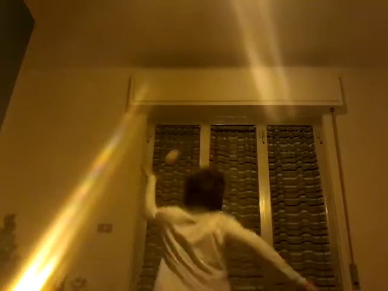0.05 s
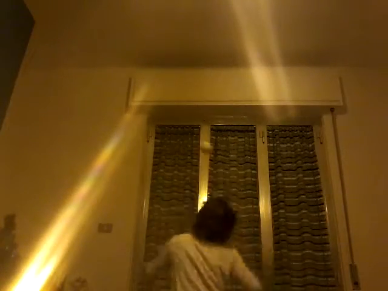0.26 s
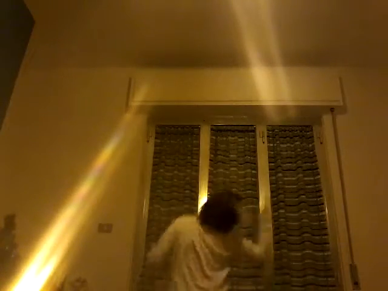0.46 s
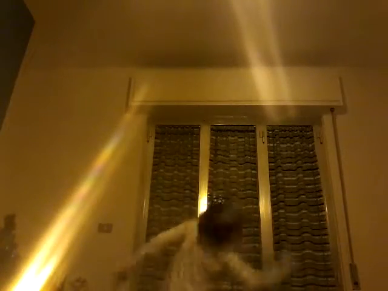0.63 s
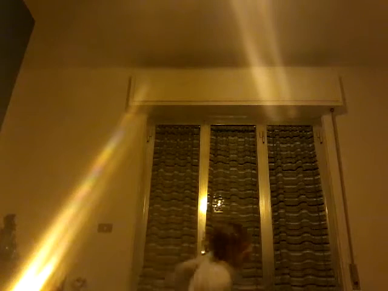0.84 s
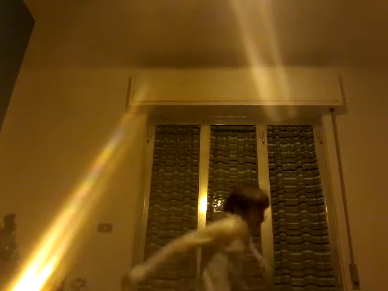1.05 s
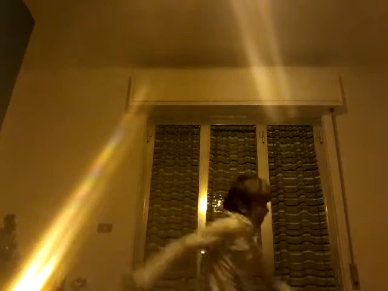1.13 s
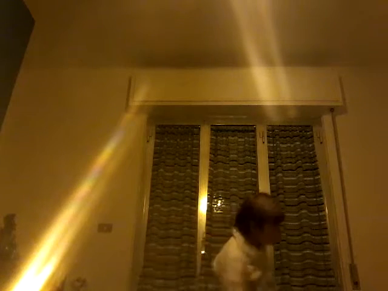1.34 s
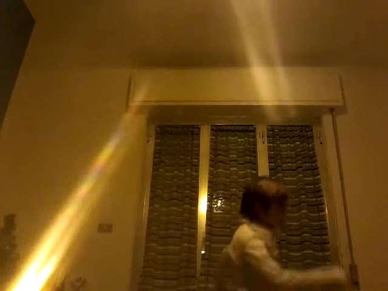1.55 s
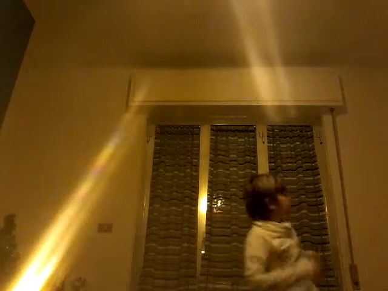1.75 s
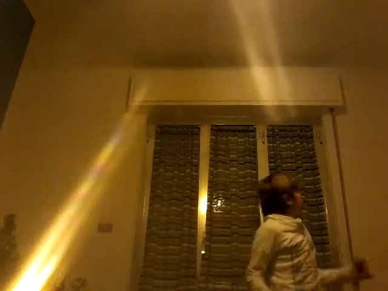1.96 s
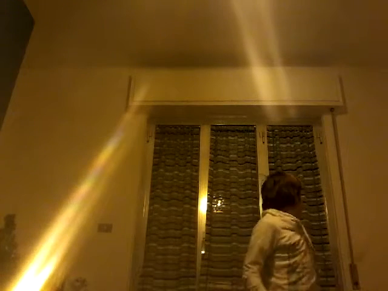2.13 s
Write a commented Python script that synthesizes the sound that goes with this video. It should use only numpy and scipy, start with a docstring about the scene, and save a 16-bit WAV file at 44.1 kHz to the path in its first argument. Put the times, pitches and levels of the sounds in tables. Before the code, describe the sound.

A ball bounces twice, hard and sharp, amid quick footsteps in a bare, echoing room.

```python
"""A ball bounces twice, hard and sharp, as a child chases it about a bare, echoing room.
Each bounce is a pulse ringing the shell; a heavy landing and quick steps are pulses of sole on floor.
Soles scuff and squeak between the blows, clothes rustle, tiny clicks sound, and the last step leaves
a low boom hanging in the room. A small microphone with a presence peak and little treble picks it up."""
import sys
import numpy as np
from scipy import signal
from scipy.fft import rfft, irfft, next_fast_len
from scipy.io import wavfile
from scipy.ndimage import uniform_filter1d, minimum_filter1d

SR = 44100
rng = np.random.default_rng(int(sys.argv[2]) if len(sys.argv) > 2 else 0)


def int16_out(signal):
    """Quantize to a 16-bit WAV file."""
    q = np.round(np.clip(np.atleast_2d(signal).T, -1, 1) * 32767)
    wavfile.write(sys.argv[1], SR, q.astype(np.int16))


N = 97020
T = np.arange(N) / SR
SIZE = next_fast_len(2 * N)
HZ = np.maximum(np.arange(SIZE // 2 + 1) * SR / SIZE, 1)

# Ball hits, the harder one with a second snap of the shell:
# t/s, level/dB, bass boost/dB, knock f/Hz, knock boost/dB, contact cut-off/Hz, direct boost/dB
BOUNCES = [(.8365, 29.5, 11, 567, -2.5, 3800, 3), (1.5352, 28.5, 5, 508, 6.5, 7100, -1),
           (1.5363, 17, -1, 3600, 12.5, 6060, 8.5)]
# Body tone of the ball: f/Hz, level/dB
BALL_EQ = [(45, -24.5), (90, -19.5), (130, 0.5), (185, 1.5), (300, -1.5), (380, -11.5), (780, -11.5),
           (1200, -10), (2100, -15.5), (3000, -15), (12000, -11.5)]
# Resonances of its shell: f/Hz, width/octaves, boost/dB
BALL_MODES = [(1101, 0.11, 8), (1297, 0.078, 4.5), (1740, 0.077, 6), (2640, 0.079, 5.5), (3780, 0.059, 5.5)]
# Heels and soles hitting the floor:
# t/s, level/dB, bass boost/dB, knock f/Hz, knock boost/dB, contact cut-off/Hz, direct boost/dB
STEPS = [(.029, -1.5, -19, 2940, 16, 7000, -20), (.0355, -8.5, 1, 1404, 27, 7000, 8),
         (.212, 13.5, 2, 250, 3.5, 6000, -6), (.2195, 6.5, -1.5, 170, 15, 6000, -4),
         (.2282, 28.5, -16, 470, 5, 8000, 0), (.2325, 25.5, -2.5, 763, 12, 8000, 4),
         (.2345, 13.5, -9, 4500, 14, 5500, -2), (.6885, 1, -36, 1020, 6.5, 12000, -8.5),
         (.744, 7, -33, 900, 9.5, 5000, -1.5), (.756, 12, 8, 780, 4.5, 6000, -4),
         (1.252, 6, -18, 1000, 4.5, 8000, -2), (1.2745, 21, 0, 3801, 3, 8200, 2.5),
         (1.796, 7, -13, 1050, 7, 12000, 0.5), (1.852, 10, 9.5, 1399, 13.5, 4900, -15),
         (1.868, 10, -7, 203, 6.5, 403.7, -15)]
# Body tone of a footfall: f/Hz, level/dB
SHOE_EQ = [(30, -38), (65, 6), (110, 5.5), (190, 6.5), (330, 1), (900, -6), (1500, -11), (2200, -13.5),
           (3500, -13), (12000, -13)]
# Resonances of a sole on the floor: f/Hz, width/octaves, boost/dB
SHOE_MODES = [(413, 0.033, 5), (1065, 0.15, 5), (4270, 0.087, 3)]
# Low end blooming in the room after steps: t/s, f/Hz, level/dB, rise/s, t60/s
BOOMS = [(.756, 66, -32, .025, .25), (.87, 74.2, -41, .04, 0.63), (1.274, 65.3, -27.5, .025, 0.4),
         (1.339, 83.85, -36, 0.072, 0.29), (1.85, 173, -34, 0.041, 0.59), (1.853, 85.7, -37.5, 0.033, 0.61),
         (1.86, 45, -46.5, 0.17, 0.85), (1.87, 133.4, -34.5, 0.11, 0.49)]
# Soles sliding and clothes brushing: t/s, length/s, level/dB, low rub from weight on the foot/dB
SCUFFS = [(-.05, 0.15, -42.5, -11), (0.163, 0.17, -50, -8), (0.417, 0.039, -37.5, -11),
          (0.47, 0.061, -35.5, 2.5), (0.696, 0.15, -42, -3), (0.972, 0.26, -56, 5.5),
          (1.378, .06, -43, 6.5), (1.80, .07, -41.5, 0), (1.928, 0.19, -57, -2.5)]
# Tone of the friction: f/Hz, level/dB
SCUFF_EQ = [(60, -5), (200, 8), (900, 4), (1600, 4), (4000, 0), (7000, 4), (14000, -3.5)]
# Rubber soles squeaking: t/s, length/s, f/Hz, width/Hz, level/dB
SQUEAKS = [(-.02, 0.047, 4270, 352, -45), (0.078, .05, 1170, 90, -58), (1.067, 0.091, 4250, 400, -54.5),
           (1.081, 0.02, 1910, 120, -55.5), (1.121, 0.018, 1886, 70, -50)]
# Tiny bright clicks: t/s, level/dB
TICKS = [(0.176, -7), (.374, -1), (0.483, 1.5), (0.6888, 0.5), (.94, -2), (1.018, -1.5), (1.547, 13.5),
         (1.797, 2), (1.809, 3.5)]
# Tone of a tick: f/Hz, level/dB
TICK_EQ = [(500, -19), (3000, -19.5), (6500, -0.5), (12000, -20)]
# Envelope of the cloth rustle as the child moves: t/s, level/dB
RUSTLE_ENVELOPE = [(0, -54), (.4, -43), (.53, -36), (.62, -64), (.72, -67), (.78, -47), (1.02, -40.5),
                   (1.2, -56), (1.41, -38.5), (1.5, -48), (2.02, -47), (2.17, -68.5)]
# Tone of the cloth: f/Hz, level/dB
RUSTLE_EQ = [(1500, -31), (4500, -8), (7000, -8), (14000, -10)]
# Decay of the reverb tail: f/Hz, t60/s
ROOM_T60 = [(60, 1), (150, 0.4), (300, 0.53), (600, 0.41), (1500, 0.45), (4000, 0.42), (8000, 0.44),
            (14000, .33)]
# Standing waves of the room: f/Hz, level/dB, t60/s
ROOM_MODES = [(79.6, -72, 1), (135.4, -64.5, 0.29), (182.6, -57.5, 0.48), (221.4, -61.5, 0.43),
              (291, -62.5, 0.4), (456, -55, .4), (526.5, -65.5, 0.56), (558, -56.5, 0.25), (671, -59, 0.23),
              (747, -79.5, 1), (941, -58, 0.38), (1230, -66, 0.3)]
# Early reflections: delay/s, level/dB
REFLECTIONS = [(.0076, -13.5), (0.0088, -13.5), (0.0117, -20), (0.0139, -12.5), (0.0257, -21),
               (.0288, -15.5)]
# Tone of the noise floor: f/Hz, level/dB
NOISE_FLOOR_EQ = [(20, -26), (40, 9.5), (70, -17), (250, -24), (600, -16.5), (2000, -28), (4200, -21),
                  (7000, -25), (15000, -26)]
# Microphone response: f/Hz, level/dB
MICROPHONE_EQ = [(20, 34), (45, -2.5), (2800, -1.5), (3900, 2), (4600, -3), (5400, -13), (7000, -22.5),
                 (10000, -25), (15000, -22.5)]

BASS_HZ, BASS_OCTAVES, KNOCK_OCTAVES = 69, 0.49, 0.43  # weight and knock of a hit
HIT_DIRECT_DB, MOVEMENT_DIRECT_DB = -13.5, -2
TAIL_DB, TAIL_BASS_DB, TAIL_BUILD_S = -1.5, -7, 0.0075
SCATTER_S = 0.00059  # furniture smears each reflection over about this time


def ball_bounces():
    """The ball smacks the floor and its shell rings."""
    return impacts(BOUNCES, BALL_EQ, BALL_MODES)


def footsteps():
    """Heels and soles thud and knock on the floor."""
    return impacts(STEPS, SHOE_EQ, SHOE_MODES)


def impacts(hits, body_eq, modes):
    """One pulse a hit, each from its own spot, shaped by body, weight, knock and contact hardness."""
    body_db = at_hz(body_eq) + sum(db * bell(hz, octaves) for hz, octaves, db in modes)
    rooms = room_responses(count=len(hits))
    out = 0
    for (s, db, bass_db, knock_hz, knock_db, cut_hz, direct_db), room in zip(hits, rooms):
        tone_db = body_db + bass_db * bell(BASS_HZ, BASS_OCTAVES)
        tone_db += knock_db * bell(knock_hz, KNOCK_OCTAVES)
        softness_db = 10 * np.log10(1 + (HZ / cut_hz) ** 6)  # a soft contact dulls the top
        pulse = from_db(HIT_DIRECT_DB + direct_db) * signal.unit_impulse(N) + room
        out = out + delayed(colour(pulse, db + tone_db - softness_db), s)
    return out


def room_booms():
    """Low resonances of the room swell and ring out."""
    out = 0
    for s, hz, db, rise, t60 in BOOMS:
        envelope = np.minimum(T / rise, 1) * from_db(db - 60 * np.maximum(T - rise, 0) / t60)
        out = out + delayed(np.sin(2 * np.pi * hz * T) * envelope, s)
    return out


def scuffs(grit=0.19, rub_hz=382, rub_octaves=0.84):
    """Grainy friction under each slide, fuller when the foot bears weight."""
    hiss = rng.standard_normal(N)
    roughness = np.repeat(rng.standard_normal(N), 64)[:N]
    grains = rms_one(hiss * np.exp(grit * roughness))
    rub = bell(rub_hz, rub_octaves)
    return sum(colour(grains * swell(s, length), db + at_hz(SCUFF_EQ) + rub_db * rub)
               for s, length, db, rub_db in SCUFFS)


def sole_squeaks():
    """Stick-slip of rubber: a narrow band of noise sings as an unsteady tone."""
    out = 0
    for s, length, hz, width, db in SQUEAKS:
        band = signal.butter(2, [hz - width / 2, hz + width / 2], "band", fs=SR, output="sos")
        tone = rms_one(signal.sosfilt(band, rng.standard_normal(N)))
        out = out + from_db(db) * tone * swell(s, length)
    return out


def ticks():
    """Tiny bright clicks, the loudest just after the second bounce."""
    clicks = sum(from_db(db) * signal.unit_impulse(N, int(s * SR)) for s, db in TICKS)
    return colour(clicks, at_hz(TICK_EQ))


def cloth_rustle():
    """Soft high hiss of cloth, swelling with each movement."""
    s, db = np.transpose(RUSTLE_ENVELOPE)
    return from_db(np.interp(T, s, db)) * shaped_noise(RUSTLE_EQ)


def room_responses(count):
    """The room from several spots: a diffuse tail dying by band, scattered reflections and modes."""
    edges = np.append(0, np.geomspace(50, SR / 2, 18))
    white = rfft(rng.standard_normal((count, N)))
    hz = np.arange(N // 2 + 1) * SR / N
    build_up = 1 - np.exp(-T / TAIL_BUILD_S)
    out = 0
    for low, high in zip(edges, edges[1:]):
        centre = (low + high) / 2
        band = irfft(white * ((hz >= low) & (hz < high)), N)
        band *= build_up * from_db(-60 * T / at_hz(ROOM_T60, centre))
        band *= np.sqrt(2 * (high - low) / SR / np.sum(band ** 2, axis=1, keepdims=True))  # flat energy
        out = out + from_db(TAIL_DB + TAIL_BASS_DB / (1 + (centre / 250) ** 2)) * band
    for s, db in REFLECTIONS:
        smear = rng.standard_normal((count, 256)) * np.exp(-T[:256] / SCATTER_S)
        smear /= np.linalg.norm(smear, axis=1, keepdims=True)
        start = int(s * SR)
        out[:, start:start + 256] += from_db(db) * smear
    modes = sum(from_db(db - 60 * T / t60) * np.cos(2 * np.pi * f * T) for f, db, t60 in ROOM_MODES)
    return out + modes


def shaped_noise(eq):
    """Steady noise through an EQ curve, at unit rms."""
    return rms_one(colour(rng.standard_normal(N), at_hz(eq)))


def colour(x, curve_db):
    """Minimum-phase EQ: nothing rings ahead of the attack."""
    cepstrum = irfft(np.log(from_db(curve_db)), SIZE)
    cepstrum[1:SIZE // 2] *= 2
    cepstrum[SIZE // 2 + 1:] = 0
    return irfft(rfft(x, SIZE) * np.exp(rfft(cepstrum)), SIZE)[:N]


def at_hz(points, hz=HZ):
    """Read a table on a log-frequency axis."""
    f, value = np.transpose(points)
    return np.interp(np.log(hz), np.log(f), value)


def bell(hz, octaves):
    """An EQ bell of height 1."""
    return np.exp(-.5 * (np.log2(HZ / hz) / octaves) ** 2)


def swell(s, length):
    """A rounded fade in and out."""
    return np.sqrt(np.abs(np.sin(np.pi * np.clip((T - s) / length, 0, 1))))


def delayed(x, s):
    """Start a sound s seconds later."""
    return np.concatenate([np.zeros(int(s * SR)), x])[:N]


def from_db(db):
    """Decibels to gain."""
    return 10 ** (np.asarray(db) / 20)


def rms_one(x):
    """Scale to unit rms."""
    return x / np.sqrt(np.mean(x ** 2) + 1e-20)


def scene():
    """Mono mix of ball, feet and small sounds in one room."""
    small = scuffs() + ticks() + sole_squeaks()
    reverb = signal.fftconvolve(small, room_responses(count=1)[0])[:N]
    hits = ball_bounces() + footsteps()
    return (hits + room_booms() + from_db(MOVEMENT_DIRECT_DB) * small + reverb + cloth_rustle())[None]


def record(dry):
    """Microphone colour, a steady noise floor, a rumble filter, a gentle limiter and a top cut."""
    floor_db, rumble_cut_hz, ceiling, top_cut_hz = -62, 32, 0.76, 15900
    heard = colour(dry[0], at_hz(MICROPHONE_EQ)) + from_db(floor_db) * shaped_noise(NOISE_FLOOR_EQ)
    heard = signal.sosfilt(signal.butter(4, rumble_cut_hz, "high", fs=SR, output="sos"), heard)
    limiter_gain = 1 / np.sqrt(1 + (heard / ceiling) ** 2)
    heard *= uniform_filter1d(minimum_filter1d(limiter_gain, size=65), size=65)  # hold, then smooth
    return irfft(rfft(heard, SIZE) * (HZ < top_cut_hz), SIZE)[None, :N]


dry = scene()
out = record(dry)
int16_out(out)
```